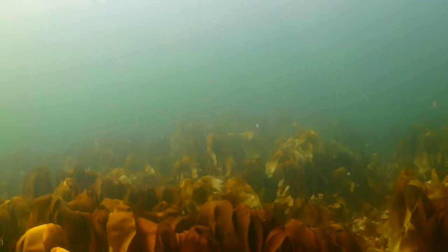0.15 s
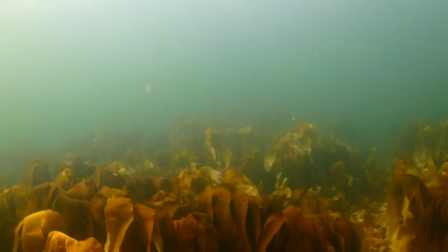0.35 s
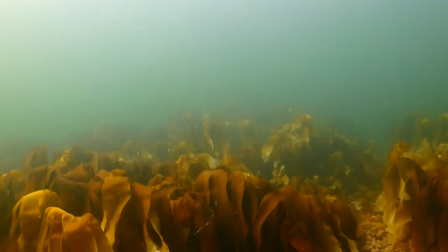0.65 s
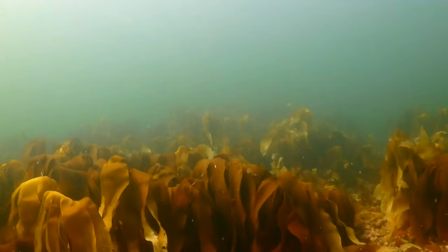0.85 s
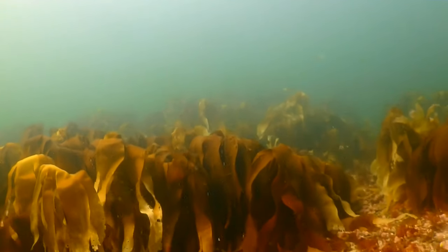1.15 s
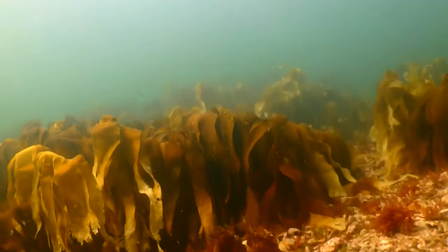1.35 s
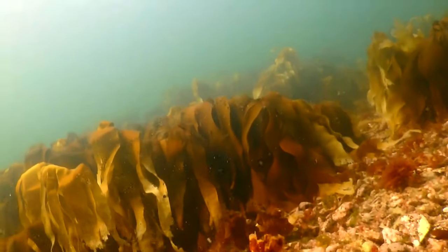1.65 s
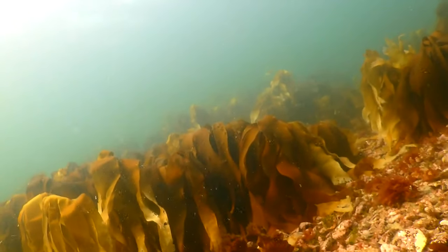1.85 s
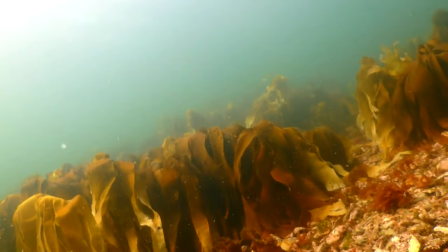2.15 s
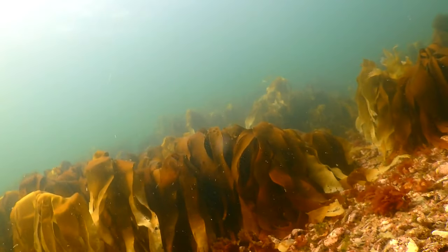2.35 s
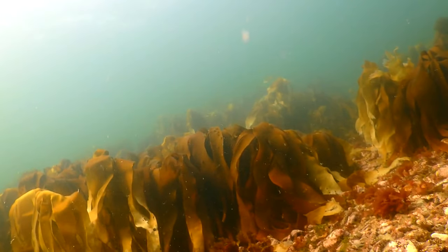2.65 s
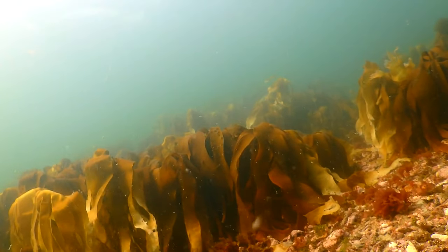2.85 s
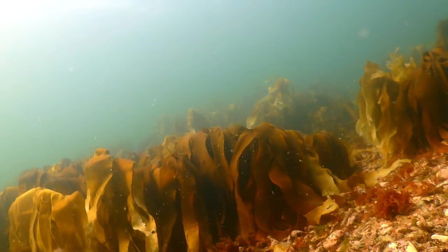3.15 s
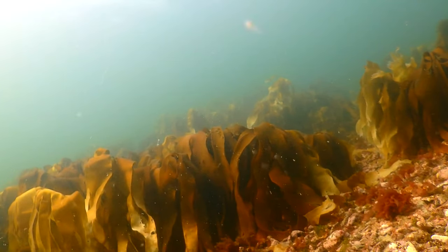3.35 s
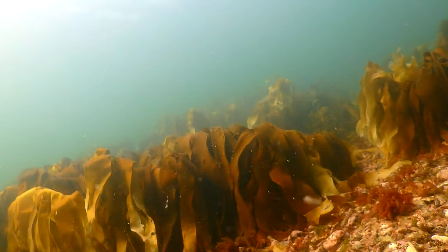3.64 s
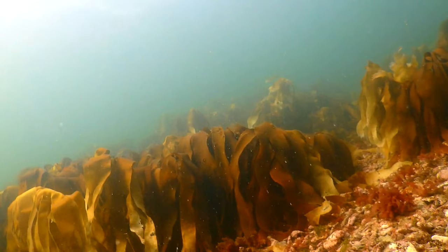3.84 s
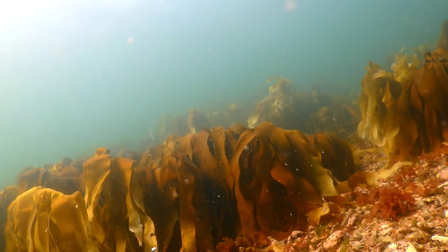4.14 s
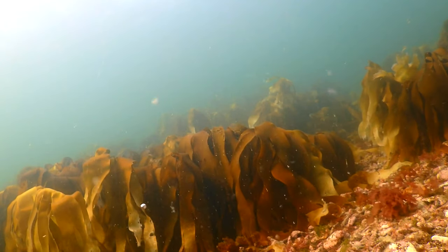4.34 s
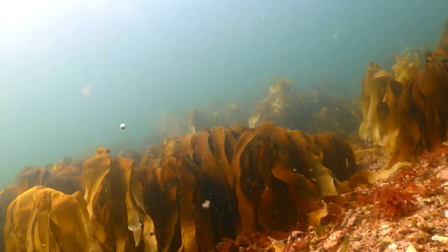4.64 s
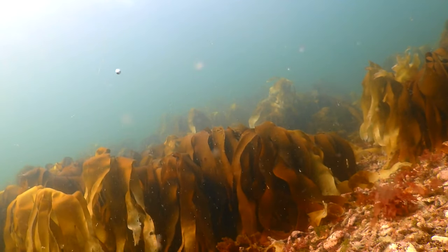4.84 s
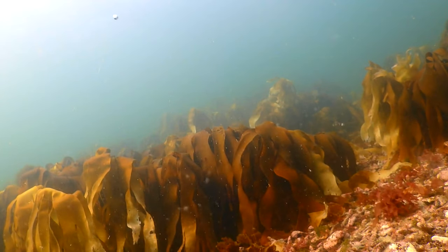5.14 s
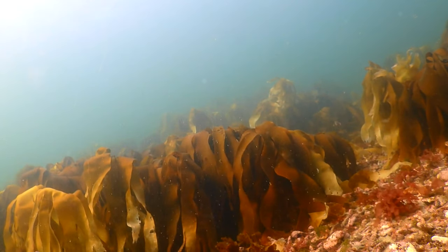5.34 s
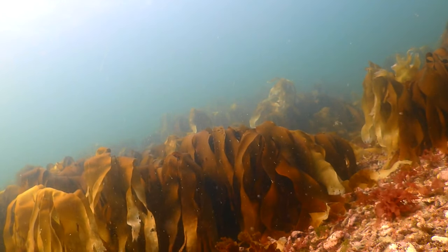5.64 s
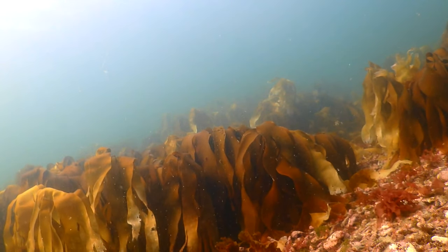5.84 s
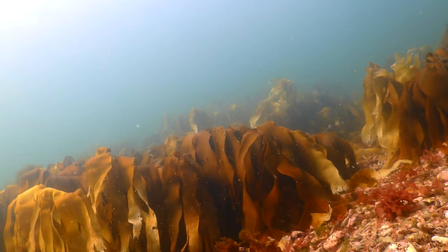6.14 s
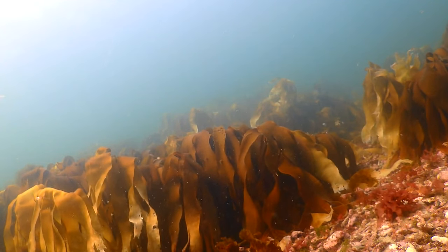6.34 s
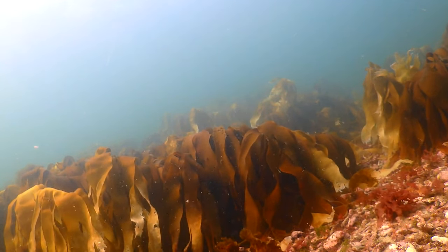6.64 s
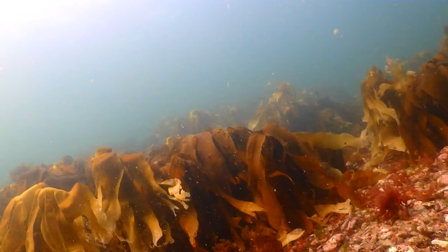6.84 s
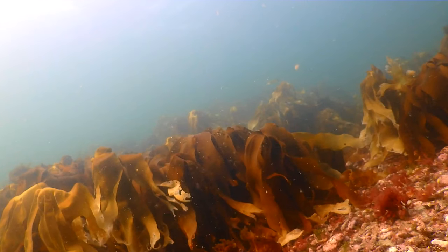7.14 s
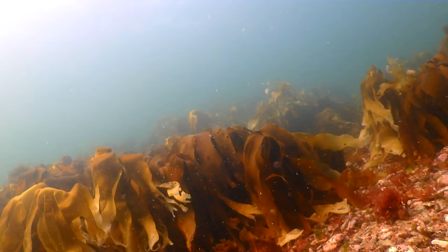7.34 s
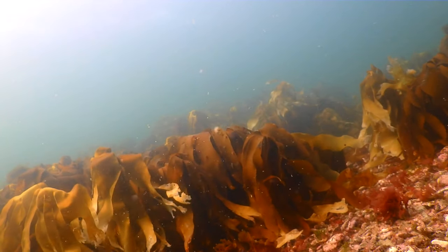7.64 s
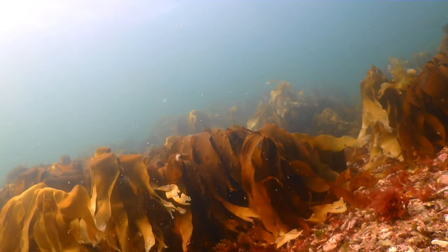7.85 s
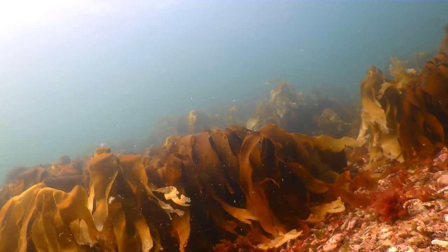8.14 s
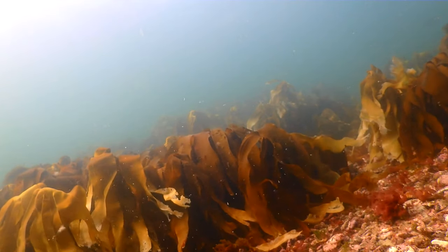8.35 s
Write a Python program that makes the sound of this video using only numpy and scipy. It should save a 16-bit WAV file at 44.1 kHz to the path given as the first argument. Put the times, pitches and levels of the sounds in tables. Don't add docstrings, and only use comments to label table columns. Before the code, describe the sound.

A hollow, muffled underwater sound: rapid low engine thuds, pulsing bubbly hiss and a faint steady whine. Early bumps lead to a rough shove and loud knock, after which the level dips and recovers. Small gravel ticks and sharp snaps follow. After an abrupt gap, only soft washes, dull knocks and tiny snaps remain, brightest on the left, with just low tones on the right.

```python
import sys
import numpy as np
from scipy import signal
from scipy.fft import rfft, irfft
from scipy.io import wavfile
from scipy.ndimage import uniform_filter1d

SR = 44100
rng = np.random.default_rng(int(sys.argv[2]) if len(sys.argv) > 2 else 0)


def wrap_up_sound(samples):
    columns = np.atleast_2d(samples).T
    tamed = np.clip(columns, -1, 1)
    steps = np.round(tamed * 32767).astype(np.int16)
    wavfile.write(sys.argv[1], SR, steps)


def volts(x):
    e = np.asarray(x, float) / 20
    return 10 ** e


N = 374409
T = np.arange(N) / SR
FADE_S, SILENCE_S, RETURN_S = 6.915, 6.958, 7.0485
BOAT_NEAR = T < SILENCE_S

FIRST_FIRING_S, FIRES_PER_S, UNEVEN_DB = .0865, 7.084, 1.3
TURNS_PER_S = 7.09
# time in seconds, firing level over the hiss in dB, lateness in ms.
BOAT = [(.08, 31, -2.5), (.3, 36, 1), (.7, 33, 2), (1.1, 40.5, -3), (1.8, 38.5, 1.5), (2.4, 40, 0),
        (2.65, 43, 2), (3.1, 39.5, 2.5), (3.45, 45, -0.5), (3.62, 42.5, -5.5), (4.05, 42.5, -2),
        (4.25, 47.5, 6.5), (4.7, 42, 1), (5.1, 41, -4), (5.7, 42, 3), (6.2, 41.5, -3), (6.9, 42, 2)]
# pitch in Hz, width in Hz, level in dB.
HULL_MODES = [(334.5, 21.7, 1.5), (477, 46, -8), (593, 70, -3.5), (670, 28, 4)]
# time in seconds, fizz in dB, harder bite of one blade in dB.
WAKE = [(0, 1, -1.5), (.5, 1, -1), (.75, 0.5, 2), (1.3, -0.5, 2), (1.8, -1, 4.5), (2.4, 0.5, 0),
        (2.9, -1, -0.5), (3.4, -1, -1.5), (3.8, -3, -0.5), (4.05, -4, -1), (4.3, -4.5, 1), (4.8, -2.5, 4.5),
        (5.2, -3.5, 3.5), (5.5, -2.5, 5), (5.9, -2, 0.5), (6.2, -2.5, 1), (6.45, -4, -1), (6.9, -3.5, -2)]
# pitch in Hz, width in Hz, level in dB.
BUBBLES = [(3130, 77, -3), (3410, 110, 0), (3570, 220, 5.5), (3810, 850, 1), (4040, 160, -4),
           (4300, 170, -6.5), (4600, 200, -12), (4750, 200, -10.5)]
WHINE_HZ = 5095

# time in seconds, peak in dB, pitch in Hz, length in ms.
KNOCKS = [(0.039, -24, 1180, 6.4), (0.109, -28, 360, 3.3), (0.47, -17.5, 1145, 6),
          (0.586, -21, 1020, 1.9), (0.618, -20.5, 392, 7.9), (0.652, -24.5, 321, 46),
          (0.841, -26, 1113, 49), (0.952, -28.5, 1090, 6), (1.255, -23.5, 1043, 11),
          (1.288, -24, 1020, 4.8), (1.363, -22, 1005, 10), (0.03, -33.5, 680, 46), (0.15, -35.5, 725, 37),
          (1.584, -24, 1020, 16), (0.088, -33, 1150, 9), (0.7, -29.5, 604, 8), (0.228, -32, 650, 7),
          (0.34, -22.5, 1060, 3.4), (0.645, -30, 1090, 5.5), (0.784, -32, 960, 9.9),
          (1.12, -27, 1070, 9.1), (1.196, -26, 970, 6.4), (1.325, -25.5, 1021, 49),
          (1.516, -29.5, 1030, 12), (1.558, -29, 1050, 9), (1.717, -33, 1050, 9.9), (1.798, -23, 880, 17),
          (1.84, -26, 1070, 16), (1.9, -14, 1010, 5.1), (1.911, -12.5, 286, 22), (1.911, -19.5, 705, 16),
          (1.928, -18, 980, 10), (1.951, -13.5, 1350, 8.3), (1.965, -24, 330, 8.8),
          (1.9765, -4, 846, 10.3), (1.9805, -17, 910, 12), (1.886, -35, 1030, 8), (1.996, -38, 850, 9.5),
          (2.039, -34, 1010, 6.6), (2.146, -38.5, 274, 60), (2.248, -35.5, 273, 34),
          (2.56, -36, 1050, 11),
          (2.102, -40, 1010, 12), (2.18, -39, 1010, 11), (2.276, -36, 900, 10), (2.497, -41, 1530, 16),
           (2.563, -43, 400, 9.9), (2.591, -35, 344, 37), (2.719, -35, 325, 23), (2.722, -39, 1510, 14),
           (0.555, -32, 344, 13), (0.785, -32, 314, 15), (3.453, -25, 700, 5.5), (4.104, -21, 660, 6.1),
           (4.128, -33.5, 3210, 55), (4.207, -35, 3170, 21), (4.238, -41, 3140, 15), (4.44, -20, 270, 15),
           (4.508, -22.5, 302, 7.9), (5.245, -29, 344, 34), (5.362, -19, 730, 5.5), (5.417, -26.5, 682, 22),
           (5.527, -27.5, 703, 19), (5.942, -16.5, 330, 9.3), (6.478, -28, 1550, 10),
           (6.644, -24.5, 418, 9.1)]
CALM = [(7.639, -37, 269, 8.3), (7.833, -41, 370, 46), (7.879, -44, 335, 34), (7.928, -44, 420, 17),
        (8.348, -40, 376, 13), (8.46, -38.5, 360, 44), (7.459, -36, 1420, 13), (7.575, -35.5, 1920, 8),
        (7.607, -42, 1450, 8), (7.481, -36, 1460, 8), (7.542, -33, 1450, 5.3), (7.434, -41, 690, 11),
        (7.702, -35, 1310, 14), (7.25, -40.5, 1050, 8.7), (7.062, -39, 734, 14), (7.104, -32.5, 414, 20),
        (7.117, -33, 656, 12), (7.134, -36, 348, 26), (7.306, -32.5, 687, 30), (7.448, -37.5, 686, 16),
        (7.5, -35, 680, 6.6), (7.591, -33, 665, 9.5), (7.654, -45, 770, 10), (7.692, -24.5, 701, 18),
        (7.763, -37, 750, 5.8), (7.89, -35, 764, 39), (8.085, -48, 690, 15), (8.151, -29.5, 435, 10),
        (8.179, -28, 730, 16), (8.365, -50, 630, 7), (8.401, -29.5, 754, 21), (7.164, -31, 620, 2.6),
        (7.237, -36.5, 444, 20), (7.291, -30.5, 780, 36), (7.477, -35, 400, 24), (7.54, -28.5, 397, 16),
        (7.567, -36, 703, 16), (7.675, -34, 690, 9.5), (7.695, -24.5, 341, 63), (7.817, -35, 750, 31),
        (7.909, -35, 806, 12), (8.051, -33, 700, 7.1), (8.075, -37, 710, 7.4), (8.128, -34.5, 725, 23),
        (8.178, -25, 413, 30), (8.332, -32, 1130, 4.4), (8.383, -34, 785, 11)]
# time in seconds, peak in dB, pitch in Hz, length in ms.
MORE_KNOCKS = [(3.185, -31.5, 1080, 11), (3.252, -40, 1070, 11), (3.396, -33, 980, 9), (3.71, -27.5, 1064, 11),
               (3.848, -30.5, 1036, 25), (3.919, -26, 1060, 9.2), (3.956, -29.5, 1120, 12), (4.178, -32, 1080, 9),
               (4.275, -32, 1060, 9), (4.347, -30, 1080, 10), (4.381, -29, 985, 12), (4.455, -37, 1080, 7.7),
               (4.525, -40, 1130, 9.9), (4.601, -29, 1020, 7.4), (4.738, -33, 1070, 8.8), (4.789, -27, 1077, 17),
               (4.823, -43, 1090, 9), (4.854, -35, 1070, 9.8), (5.227, -32, 1080, 9), (5.319, -36, 1060, 9),
               (5.426, -33, 1120, 11), (5.973, -28.5, 1180, 7.8), (6.056, -35, 1140, 8.2), (6.142, -44, 1050, 9),
               (6.24, -35, 1000, 9), (6.426, -26.5, 1010, 10), (6.478, -23.5, 1040, 9), (6.645, -30, 1090, 8.4),
               (6.682, -44, 1110, 10), (6.731, -47, 1050, 9)]
# time in seconds, peak in dB, pitch in Hz, 60 dB decay in ms.
BUSY_SNAPS = [(0.0233, -32, 3380, 17), (0.254, -25, 2600, 37), (0.4519, -32.5, 3570, 470),
              (1.86, -28, 3470, 12), (1.9295, -34, 3740, 23), (1.9765, -7.5, 2360, 5.1),
              (1.9956, -36, 2400, 9.9), (2.171, -45, 4400, 19), (2.417, -46, 3460, 25),
              (2.5001, -29.5, 3000, 47), (3.4163, -37, 3480, 38), (3.455, -29.5, 5000, 13),
              (3.648, -40, 4800, 12), (3.65, -45, 2900, 13), (3.804, -33, 2800, 11),
              (4.094, -34, 4700, 9.1), (4.106, -34, 4800, 11), (4.115, -28, 2900, 8),
              (5.247, -31, 2400, 24), (3.5175, -30, 2810, 41), (3.9154, -25, 3120, 31),
              (4.101, -25.5, 4800, 41), (4.2759, -26, 2920, 110), (4.4388, -34.5, 3500, 25),
              (4.6723, -31, 4100, 25), (4.9703, -35, 4310, 25), (5.1741, -43, 3660, 25),
              (5.245, -28, 4860, 32), (5.365, -32, 3000, 25), (5.4325, -30, 4600, 22),
              (5.5274, -31.5, 3180, 19), (5.942, -28, 4200, 80), (5.943, -23, 2590, 12),
              (6.343, -33, 4800, 8.5), (6.4263, -30, 2660, 29), (6.5859, -25, 4130, 8.9),
              (6.6338, -30.5, 3620, 34)]
CALM_SNAPS = [
    (7.333, -39.5, 5000, 14),
    (7.48, -39, 4970, 22),
    (7.5426, -32.5, 3580, 11),
    (7.697, -37, 4170, 42),
    (7.975, -33.5, 4880, 7.9),
    (8.076, -29.5, 3460, 25),
    (8.128, -38.5, 5110, 95),
    (8.185, -33.5, 5000, 22),
    (8.331, -43, 5060, 20),
    (8.4117, -33, 3980, 41),
]

# pitch in Hz, width in Hz, level in dB.
HOUSING_MODES = [(327, 30, 0), (457, 55, -4),
                 (197, 320, 9.5), (563, 125, 7), (683.5, 152, 5), (1044, 72, 0), (1090, 60, 1),
               (1188, 104, -4), (1497, 390, 2.5), (2228, 330, -3.5), (2576, 590, -6.5), (3140, 300, -12.5),
               (3570, 840, -9), (4260, 1100, -5.5), (5000, 84, -5.5)]
# frequency in Hz, level in dB, lag in turns.
COVERED_PORT = [(60, 0, .0), (260, .2, -.01), (340, .6, .09), (400, 3.5, .26), (450, 1.2, .35),
                (520, -2.5, .43), (620, -12, .33), (750, -19, .13), (900, -17, .15), (1100, -30, -.08),
                (1300, -26, -.33), (1700, -30, -.7), (6000, -32, -.8)]
LEAD = 132
# time in seconds, level in dB.
FACING = [(0, -5), (.7, -7), (1.5, -9.5), (2.4, -8), (3.2, -3.5), (6.9, -3.5), (7.05, -6.5)]
# start in seconds, length in seconds, push in dB, rub in dB.
SHOVES = [
    (0.52, 0.35, -15, 0.5),
    (1.296, 0.19, 11.5, 2),
    (1.877, 0.14, 23.5, 16),
    (2, 0.38, 14, 7.5),
    (2.327, 0.44, 3, 2.5),
    (1.49, 0.52, 5.5, 1.5),
    (4.05, 0.73, 8, 1.5),
    (4.355, 0.16, 4, 2.5),
    (6.45, 0.16, -3.5, -1.5),
]
# peak in seconds, half length in seconds, lap in dB, brightness in dB.
LAPS = [
    (7.045, 0.16, 5.5, 4),
    (7.333, 0.037, 6, 3.5),
    (7.53, 0.094, 2.5, 1.5),
    (7.709, 0.03, 20.5, 5.5),
    (7.817, 0.044, 2.5, 3.5),
    (7.884, 0.03, 8, 3),
    (7.99, 0.038, 4, 4),
    (8.092, 0.017, 10, 5),
    (8.185, 0.033, 17, 3),
    (8.405, 0.088, 7.5, 3),
]
EDGE_S = 0.041
DEEP_LAP_DB = 9.5
IDLE_DB, LULL_DB = (14.3, 20.3, 23.6, 17.84), (0, 10.5, 12.5, 1.5)
RUB_SHARE = (0.18, 0.64, 0.94, 0.12)
NEAR_SHARE = 0.22

# frequency in Hz, density in dB per Hz.
HISS = [(30, 4.5), (300, 18), (900, 9.5), (2000, 7), (4500, -1), (6200, -6), (7500, 0.5), (10000, 2.25),
        (15000, 1.5), (20000, -23)]
REST_DB, DIVE_DB, CALM_DB = -63.5, -19, -64.5
DIVE_S, DIVE_LENGTH_S, HOLD_S, RECOVER_DB_PER_S = 1.879, 0.13, 0.2, 12.5
# frequency in Hz, threshold in standard deviations.
DROPOUT = [(5300, 9), (5700, .6), (6200, 0), (6600, .1), (7200, .1), (8000, .4), (9500, .7), (11000, 1.2),
           (14800, 1.5), (15300, .3)]
TOP_HZ = 15560
OFFSET, DITHER = -.001, .00003


def engine(mix):
    hull = ports(band(rings(HULL_MODES), 285, 950))
    window = np.hanning(340)
    blow = np.sin(2 * np.pi * 410 * np.arange(len(window)) / SR)
    beat = np.arange(FIRST_FIRING_S, FADE_S, 1 / FIRES_PER_S)
    at, firing_db, late_ms = np.transpose(BOAT)
    times = beat + np.interp(beat, at, late_ms) / 1000
    levels = recorder_db(beat) + np.interp(beat, at, firing_db)
    for s, peak_db in zip(times, levels):
        late, weak, uneven = rng.standard_normal(3)
        rough = rng.standard_normal(len(window))
        firing = window * (blow + 0.87 * rough)
        strike(mix, s - .002, peak_db - 0.5 + UNEVEN_DB * uneven, firing, hull)
        return_s = s + .56 / TURNS_PER_S + 0.00375 * late
        strike(mix, return_s, peak_db - 11.0 + 0.53 * weak, window * (blow + 4.5 * rough), hull)


def propeller_swish():
    at, _, late_ms = np.transpose(BOAT)
    shaft = 2 * np.pi * TURNS_PER_S * (T - np.interp(T, at, late_ms) / 1000)
    sweep = 2 * shaft + 2.65 - .075 * T
    pulse_db = 7 * np.tanh(1.3 * np.cos(sweep + 0.35 * np.cos(sweep)))
    at, fizz_db, bite_db = np.transpose(WAKE)
    wake_db = np.interp(T, at, fizz_db) + np.interp(T, at, bite_db) * np.cos(shaft + 2.0)
    return volts(pulse_db + 0.5 * drift(16) + wake_db)


def bubble_swarm():
    out = np.zeros(N)
    for hz, width, db in BUBBLES:
        pops = rng.standard_normal(N) * volts(db + 1.2 * drift(24))
        out += signal.lfilter(*signal.iirpeak(hz, hz / width, SR), pops) / np.sqrt(width)
    return out


def gear_whine():
    return np.sin(2 * np.pi * WHINE_HZ * T + 0.35 * drift(2.7)) * volts([[0], [-25]])


def knocks(mix, body):
    t = np.arange(2400) / SR
    for s, peak_db, hz, ms in KNOCKS + CALM + MORE_KNOCKS:
        rise = 1 - np.exp(-t / (.0005 + .00007 * ms))
        shape = rise * np.exp(-t / (0.0004 * max(ms, 1))) * np.cos(np.pi / 2 * t / t[-1])
        rough = band(rng.standard_normal(len(t)), .65 * hz, 1.9 * hz, order=2)
        strike(mix, s - .001, peak_db, shape * (np.sin(2 * np.pi * hz * t) + 1.25 * rough), body)


def snaps(mix, body):
    t = np.arange(1500) / SR
    for s, peak_db, hz, ms in BUSY_SNAPS + CALM_SNAPS:
        burst = rng.standard_normal(len(t)) * volts(-60 * t / (0.0012 * max(ms, 2)))
        crack = band(burst, 1800, 14000, order=2)
        pitched = band(burst, 0.85 * hz, 1.326 * hz, order=1)
        strike(mix, s, peak_db, crack + 5.6 * pitched, body)
        thin = band(burst, 8200, 12000, order=2)
        thin_db = 1.77 * (peak_db + 14.5) - 30
        add(mix, s, volts(thin_db) * thin / abs(thin).max() * volts([[4.], [-8.]]))


def sand():
    return volts(2.6 * np.minimum(rng.exponential(1, N), 3)) * (rng.random(N) < 40 / SR)


def mid_wash(body, grit):
    wash = rng.standard_normal(N) * (volts(1.1 * drift(52)) + signal.lfilter([.6], [1, -.992], grit))
    facing_db = np.interp(T, *np.transpose(FACING))
    upper = volts(facing_db) * band(wash, 1380, 1892)
    lower = volts(-11.0 - 1.46 * facing_db) * band(wash, 820, 1029)
    return through(band(wash, 1012, 1210) + upper + lower, body)


def low_wash(body):
    wash = rng.standard_normal(N) * volts(1.5 * drift(36))
    busy = through(band(wash, 406, 1125, order=2) + 0.73 * band(wash, 323.6, 337, order=1), body)
    calm = through(band(wash, 566, 900, order=2) + 0.5 * band(wash, 312, 410, order=2), body)
    return np.where(BOAT_NEAR, busy, calm * volts(2.2 * drift(45)))


def surge(surge_db):
    swell = rng.standard_normal((2, N))
    a, b = band(swell, 159, 295, order=2) + 1.05 * band(swell, 127.3, 129, order=1)
    push = evened(np.array([a + .25 * b, a - .25 * b]) * volts(3.2 * drift(14)))
    rock_db = np.minimum(1.6 * (surge_db - 33), 0)
    right, left = [evened(band(rng.standard_normal(N), 40, 220, order=2)) for _ in range(2)]
    return push + volts(rock_db + 1) * right * [[.15], [-.9]] + volts(rock_db) * left * [[.7], [0]]


def hiss():
    hz, db = np.transpose(HISS)
    colour = volts(np.interp(np.log(np.fft.rfftfreq(N, 1 / SR) + 1), np.log(hz), db))
    return irfft(rfft(rng.standard_normal((2, N))) * colour, N)


def motion_db(t):
    push_db, rub_db, lap_db, bright_db = np.zeros((4, len(t)))
    for s, length, push, rub in SHOVES:
        held = np.clip(np.minimum(t - s, s + length - t) / EDGE_S, 0, 1)
        push_db = np.maximum(push_db, push * held)
        rub_db = np.maximum(rub_db, rub * held)
    for s, half, lap, bright in LAPS:
        crest = np.maximum(1 - abs(t - s) / half, 0)
        lap_db = np.maximum(lap_db, lap * crest)
        bright_db = np.maximum(bright_db, bright * crest)
    s, firing_db, _ = np.transpose(BOAT)
    near_db = NEAR_SHARE * (np.clip(np.interp(t, s, firing_db), 31, 41) - 37)
    idle = np.reshape(IDLE_DB, (4, 1)) + np.outer(RUB_SHARE, rub_db) + [push_db, 0 * t, near_db, 0 * t]
    rock_db = 2.4 * np.maximum(lap_db - DEEP_LAP_DB, 0)
    lull = np.reshape(LULL_DB, (4, 1)) + [rock_db, lap_db, 1.8 * bright_db, 2.16 * bright_db]
    return np.where(t < SILENCE_S, idle, lull)


def recorder_db(t):
    dive = np.clip((t - DIVE_S) / DIVE_LENGTH_S, 0, 1) ** 2
    back_db = RECOVER_DB_PER_S * np.maximum(t - DIVE_S - DIVE_LENGTH_S - HOLD_S, 0)
    return np.where(t < SILENCE_S, REST_DB + np.minimum(DIVE_DB * dive + back_db, 0), CALM_DB)


def steady(body):
    surge_db, low_db, mid_db, fizz_db = motion_db(T)
    swish, grit = propeller_swish(), sand()
    fizz = through(bubble_swarm() * swish, body)
    far = rng.standard_normal(N) * (volts(1.5 * drift(70)) + signal.lfilter([0.8], [1, -.98], np.roll(grit, 9000)))
    far_fizz = through(band(far, 1570, 5070, order=2) * swish ** 0.22, body)
    calm_fizz = through(band(far, 2700, 5700, order=1), body)
    boat = volts(fizz_db - 0.5) * fizz + volts(fizz_db - 3.0) * far_fizz + gear_whine()
    bright = np.where(BOAT_NEAR, boat, volts(fizz_db + 3.0) * calm_fizz)
    mid = volts(mid_db - 0.8) * mid_wash(body, grit) * np.where(BOAT_NEAR, swish, 1) ** 0.21
    low = volts(low_db + 3.5) * low_wash(body)
    return volts(recorder_db(T)) * (bright + mid + low + volts(surge_db) * surge(surge_db) + volts(9.5) * hiss())


def housing():
    top = signal.butter(8, 5400, fs=SR, output="sos")
    bottom = signal.butter(2, 170, "high", fs=SR, output="sos")
    return ports(signal.sosfilt(np.vstack([top, bottom]), rings(HOUSING_MODES)))


def rings(modes):
    hz, width, db = np.transpose(modes)[:, :, None]
    t = np.arange(4096) / SR
    return (volts(db) * width * np.exp(-np.pi * width * t) * np.sin(2 * np.pi * hz * t)).sum(0)


def ports(left):
    left = np.roll(left * np.hanning(2 * len(left))[len(left):], LEAD)
    hz, db, lag = np.transpose(COVERED_PORT)
    f = np.log(np.fft.rfftfreq(len(left), 1 / SR) + 1)
    cover = volts(np.interp(f, np.log(hz), db)) * np.exp(-2j * np.pi * np.interp(f, np.log(hz), lag))
    return np.array([left, irfft(rfft(left) * cover)])


def through(x, body):
    return evened(signal.oaconvolve(x[None], body, axes=1)[:, :N])


def strike(mix, s, peak_db, push, body):
    ring = signal.fftconvolve(push[None], body, axes=1)
    add(mix, s - LEAD / SR, volts(peak_db) * ring / abs(ring.mean(0)).max())


def add(mix, s, sound):
    part = mix[:, max(round(s * SR), 0):][:, :sound.shape[1]]
    part += sound[:, :part.shape[1]]


def evened(x):
    return x / np.sqrt(np.mean(np.atleast_2d(x).mean(0) ** 2) + 1e-20)


def band(x, lo_hz, hi_hz, order=3):
    return signal.sosfilt(signal.butter(order, [lo_hz, hi_hz], "band", fs=SR, output="sos"), x)


def drift(per_s):
    size = round(SR / per_s)
    return evened(uniform_filter1d(uniform_filter1d(rng.standard_normal(N), size), size))


def scene():
    body, mix = housing(), np.zeros((2, N))
    engine(mix)
    knocks(mix, body)
    snaps(mix, body)
    return mix + steady(body)


def band_limit(x):
    return signal.sosfilt(signal.butter(12, 16120, fs=SR, output="sos"), x)


def record(dry):
    hz, frames, z = signal.stft(np.clip(dry, -1, 1), SR, nperseg=2048, noverlap=1024)
    which = (hz // 300).astype(int)
    both = rng.standard_normal((z.shape[2], 1, 129))
    own = rng.standard_normal((z.shape[2], 2, 129))
    luck = uniform_filter1d(.8 * both + .6 * own, size=3, axis=0).transpose(1, 2, 0) * np.sqrt(3)
    odds = np.interp(np.arange(129) * 300, *np.transpose(DROPOUT))
    kept = luck < odds[:, None] + .035 * (recorder_db(frames) - REST_DB)
    kept |= abs(frames - DIVE_S - .1) < .035
    edge = np.clip((TOP_HZ - hz) / 120, 0, 1)[:, None]
    heard = signal.istft(z * kept[:, which] * edge, SR, nperseg=2048, noverlap=1024)[1][:, :N]
    resting = OFFSET * volts(np.where(BOAT_NEAR, recorder_db(T) - REST_DB, 0))
    fade = np.where(T < RETURN_S, np.clip((SILENCE_S - T) / (SILENCE_S - FADE_S), 0, 1), 1)
    mix = (heard + resting) * fade + DITHER * (1 - fade) * rng.standard_normal(N)
    return band_limit(mix)


dry = scene()
out = record(dry)
wrap_up_sound(out)
```